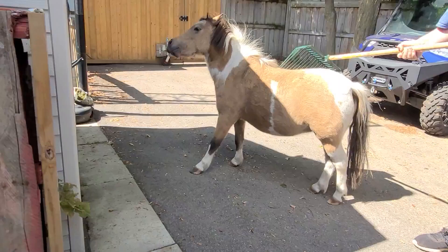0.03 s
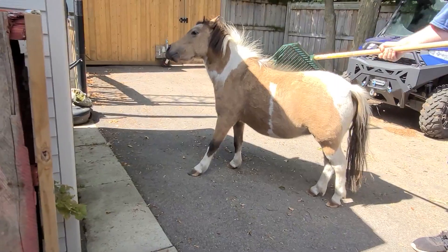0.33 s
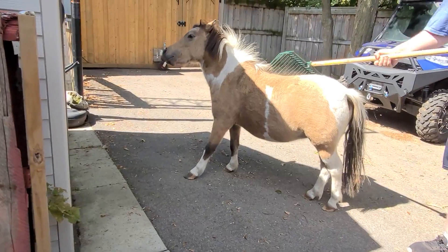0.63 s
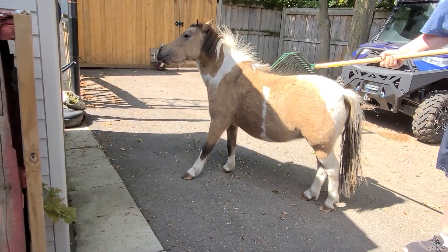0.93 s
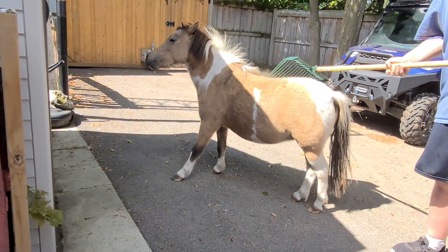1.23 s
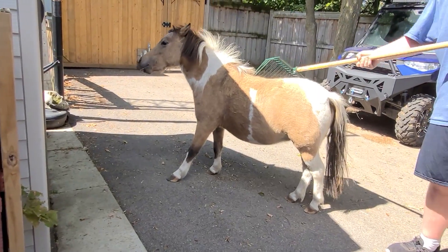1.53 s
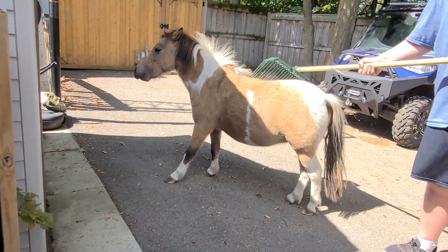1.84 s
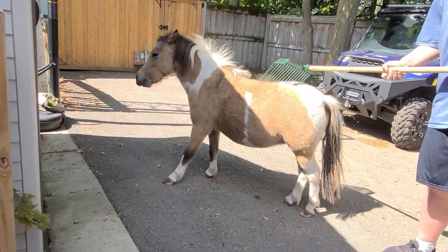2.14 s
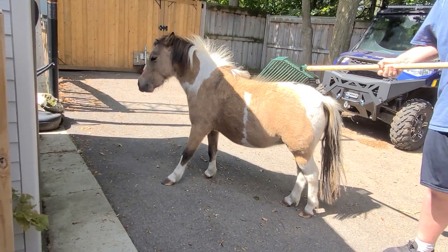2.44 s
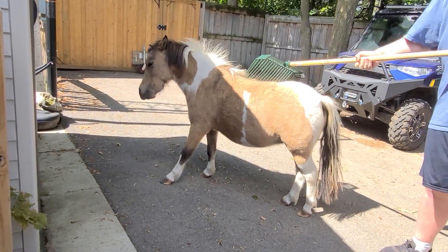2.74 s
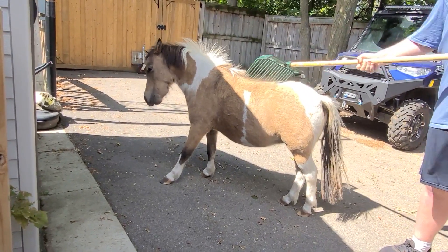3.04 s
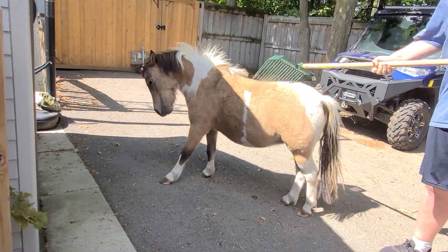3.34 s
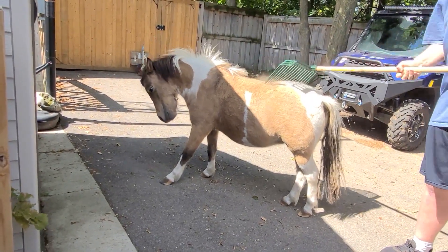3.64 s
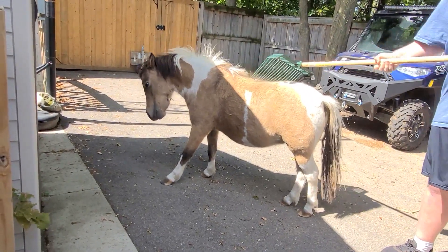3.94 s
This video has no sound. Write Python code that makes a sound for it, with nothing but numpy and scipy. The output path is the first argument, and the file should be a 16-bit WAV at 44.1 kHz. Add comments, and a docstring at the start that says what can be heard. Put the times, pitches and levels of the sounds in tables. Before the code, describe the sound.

A plastic rake strokes a small horse's back with a soft, rhythmic hiss and lightly ringing prongs, a few metres away on a driveway. The pulls grow firmer as wind thumps ever harder on the microphone's right side.

```python
"""After a blink of silence, a plastic leaf rake moves to and fro along a small horse's back, on a
driveway a few metres away. Hairs slip off the tines (the prongs) as a soft hiss and make them ring.
Early on, one tine squeaks and a tuft of hair lets go with a flick. Midway, a dull rustle swells once.
In the second half the pulls get firmer and a rising breeze thumps ever harder on the right microphone
port (its opening). A faint outdoor hush lies under it all."""
import sys
import numpy as np
from scipy import signal
from scipy.fft import rfft, irfft
from scipy.io import wavfile

SR = 44100
rng = np.random.default_rng(int(sys.argv[2]) if len(sys.argv) > 2 else 0)


def inscribe(sig):
    """Save sig as 16-bit PCM at rate SR to the path in sys.argv[1].

    A 1-D sig is mono; a 2-D sig holds one channel per row.
    Samples are clipped to [-1, 1] before scaling.
    """
    pcm = np.round(np.clip(np.atleast_2d(sig).T, -1, 1) * 32767)
    wavfile.write(sys.argv[1], SR, pcm.astype(np.int16))


N = 176400
T = np.arange(N) / SR
HZ = np.maximum(np.fft.rfftfreq(N, 1 / SR), 1)

# firm pulls of the rake: (fastest moment [s], level [dB], rise [s], fall [s], extra ringing [dB])
RAKE_PULLS = [(.278, -49, 0.062, 0.11, -1.5), (.672, -52.5, 0.07, 0.15, 0),
              (1.066, -50.5, 0.054, 0.13, -1.5), (1.862, -51, 0.066, 0.17, -2.5),
              (2.275, -48, 0.074, 0.11, 0), (2.664, -46.5, 0.072, 0.11, 0), (3.056, -45, .075, 0.099, 3),
              (3.435, -46, 0.075, 0.098, 1.5), (3.81, -44, 0.055, 0.1, 4.5)]
# light slides, mostly back: (fastest moment [s], level [dB], rise [s], fall [s], extra ringing [dB])
RAKE_SLIDES = [(.138, -55, 0.048, 0.074, -4.5), (0.509, -55, 0.16, 0.11, -1.5), (.9, -55.5, 0.097, .13, -5),
               (1.29, -56, 0.095, 0.17, -3.5), (1.48, -54.5, 0.098, .13, -2),
               (1.65, -57.5, 0.061, 0.076, 0.5), (1.738, -56, 0.083, 0.091, -2),
               (2.055, -56, 0.055, 0.034, 1.5), (2.14, -52.5, 0.096, 0.078, -3.5),
               (2.465, -55, 0.16, 0.2, -2.5), (2.855, -52, 0.12, 0.15, -1), (3.22, -52, 0.068, 0.2, -1.5),
               (3.63, -53, 0.14, 0.2, -2.5), (3.98, -50, 0.066, .1, -2)]
# tone of the hissing hair: (frequency [Hz], level [dB])
HAIR_TONE = [(300, 4.5), (700, 3), (1200, -3), (1800, 2), (2700, 0), (3400, -1.5), (4600, 3), (5600, 0),
             (6700, 1), (8200, -4), (9100, -9), (10500, -1), (12500, 0), (16000, -2.5)]
# notes the tines ring at: (pitch [Hz], width [Hz], level in a pull [dB], level in a slide [dB])
TINE_NOTES = [(1605, 46, -5.5, -4), (1759, 89, 0, -1), (1913, 49, 1.5, 0), (2056, 31, 4.5, -5.5),
              (2200, 74, -3, -4.5), (2388, 86, -2, -6), (2635, 155, -5.5, -8), (2950, 22, -17, -10),
              (4485, 106, -6, -10.5)]
# tone of the tines flicking off a tuft: (frequency [Hz], level [dB])
FLICK_TONE = [(500, -22), (1300, -5), (1750, 9), (2500, -12), (3100, -1), (4700, 0.5), (6000, -6),
              (9000, -8), (12000, -5), (16000, -7)]
# gusts hitting the ports: (time [s], strength [dB], pitch on the right [Hz], change on the left [dB])
GUSTS = [(0.142, -33, 68, -29), (.355, -50, 79.5, -25), (0.517, -38, 63.3, -20), (0.773, -30.5, 115, -26),
         (0.895, -39.5, 59.3, -18), (0.976, -37, 60.4, -28), (1.064, -31.5, 59.5, -20),
         (1.13, -27.5, 100, -14), (1.147, -30.5, 176, -30), (1.155, -24, 66.5, -33),
         (1.244, -39, 91.5, -27), (1.288, -33.5, 65, -34), (1.363, -30, 69, -38), (1.407, -35.5, 76, -26),
         (1.547, -29, 70.5, -34), (1.631, -35, 100, -22), (1.743, -23, 61.3, -36), (1.807, -34, 92, -22),
         (1.857, -28, 122, -11), (1.881, -34.5, 83, -4), (1.933, -37.5, 83.4, -32), (1.976, -32, 82, -30),
         (2.051, -28, 102, -39), (2.117, -27, 113, -31), (2.144, -24.5, 120, -31), (2.184, -26, 149, -28),
         (2.206, -29.5, 149, -30), (2.268, -33, 79.6, -29), (2.327, -32.5, 102, -30),
         (2.391, -22, 138, -34), (2.423, -28.5, 132, -24), (2.514, -27, 101, -40), (2.556, -22, 103, -39),
         (2.628, -16.5, 133.3, -35), (2.675, -18, 111, -33), (2.724, -18, 135, -30),
         (2.745, -17.5, 79, -14), (2.774, -15, 113, -25), (2.789, -22, 177, -30), (2.828, -16.5, 251, -41),
         (2.851, -24.5, 82, -15), (2.93, -17.5, 162, -38), (2.975, -20, 119, -28), (2.99, -21.5, 117, -24),
         (3.035, -17, 111, -34), (3.086, -19.5, 101, -30), (3.125, -23, 100, -3), (3.189, -20.5, 105, -19),
         (3.228, -21.5, 115, -18), (3.296, -23, 140, -18), (3.33, -21, 109, -20), (3.351, -23.5, 137, -27),
         (3.376, -23.5, 118, -25), (3.441, -20.5, 136, -24), (3.516, -19.5, 123, -34),
         (3.536, -22, 153, -27), (3.555, -20, 116, -25), (3.586, -22.5, 78.5, -26), (3.635, -19, 122, -34),
         (3.726, -20.5, 240, -41), (3.75, -19.5, 70, -23), (3.779, -20, 130, -27), (3.797, -16.5, 87, -33),
         (3.815, -23.5, 97, -30), (3.833, -21, 115, -28), (3.863, -19.5, 154, -32), (3.888, -13, 124, -41),
         (3.967, -22, 103, -20)]
# strength of the breeze: (time [s], level [dB])
BREEZE_LEVEL = [(.1, -28.5), (.7, -21), (1.1, -18), (1.5, -22), (1.75, -13.5), (2.0, -11.5), (2.2, -5.5),
                (2.47, -9), (2.72, -1.5), (3.05, 0), (3.3, -1.5), (3.42, -6), (3.55, -1.5), (3.8, 5),
                (4.0, -5)]
# how the ports colour the wind: (frequency [Hz], boost [dB])
PORT_TONE = [(15, -2), (28, 8), (45, 9), (70, -0.5), (125, -1), (190, -5), (250, 4), (340, 2), (600, 3),
             (1200, 16)]
# tone of the outdoor hush: (frequency [Hz], level [dB])
HUSH_TONE = [(25, -2), (60, 7), (105, -21), (160, 4.5), (205, -1), (280, 5.5), (350, 3.5), (480, 0),
             (900, -3), (1500, -7.5), (2200, -22), (3400, -18), (4900, -9), (6000, -18), (8000, -10.5),
             (9100, -20.5), (12000, -29.5), (16000, -52)]
# loudness of the hush: (time [s], level [dB])
HUSH_LEVEL = [(.1, -59.5), (1.5, -56.5), (2.0, -55), (2.6, -55.5), (3.3, -55.5), (4.0, -53.5)]
# tone of the dull rustle: (frequency [Hz], level [dB])
RUSTLE_TONE = [(200, -20), (450, -5), (850, -2.5), (1300, -12.5), (3000, -18.5), (16000, -36)]

SWIRL_MIN_HZ, SWIRL_MAX_HZ = 65, 250   # limits on the base pitch of small swirls


def rake(tines_db=-6, tines_right_db=2.5, hair_left_db=0.34, grip_db=1.23, grip_hz=32.8):
    """Hairs hiss and tines ring with each stroke; once, the tines catch a tuft and flick free."""
    pull, pull_ring = strokes(RAKE_PULLS)
    slide, slide_ring = strokes(RAKE_SLIDES)
    flick = swell(at_s=0.399, width_s=0.0095, db=-47.5)
    hiss = np.hypot(pull, slide) * coloured(hair_slips(), HAIR_TONE)   # hypot adds two noise levels
    hiss *= from_db([[hair_left_db], [-hair_left_db]])   # rows are left and right
    ring = pull_ring * tines(hair_slips(), pulled=True)
    ring += np.hypot(slide_ring, flick) * tines(hair_slips(), pulled=False)
    ring *= from_db([[tines_db - tines_right_db], [tines_db + tines_right_db]])
    uneven_grip = from_db(grip_db * drift(grip_hz))
    return (hiss + ring) * uneven_grip + flick * coloured(hair_slips(), FLICK_TONE)


def strokes(rows, steepness=1.99):
    """Each stroke speeds up and dies away. Gives the strength of its hiss and of its ringing."""
    hiss_power = ring_power = 0
    for peak_s, db, rise_s, fall_s, ring_db in rows:
        from_peak = np.where(T < peak_s, (peak_s - T) / rise_s, (T - peak_s) / fall_s)
        stroke = from_db(db) * np.exp(-steepness * from_peak ** 2)
        hiss_power += stroke ** 2
        ring_power += (stroke * from_db(ring_db)) ** 2
    return np.sqrt(hiss_power), np.sqrt(ring_power)


def hair_slips(hairs_per_s=14000, spread_db=2):
    """Each hair slipping off a tine makes a tiny click; left and right get their own clicks."""
    sizes = from_db(spread_db * np.minimum(rng.exponential(1, (2, N)), 5))
    signs = rng.choice([-1, 1], (2, N))
    slipping = rng.random((2, N)) < hairs_per_s / SR
    return sizes * signs * slipping


def tines(slips, pulled):
    """Clicks make the plastic tines ring in short notes, mixed differently for a pull and a slide."""
    ring = 0
    for k, (hz, width_hz, pull_db, slide_db) in enumerate(TINE_NOTES):
        decay = np.exp(-np.pi * width_hz / SR)   # a wider note dies sooner
        feedback = [1, -2 * decay * np.cos(2 * np.pi * hz / SR), decay ** 2]
        note = (1 - decay ** 2) / 2 * signal.lfilter([1, 0, -1], feedback, slips)
        ring += from_db(pull_db if pulled else slide_db) * note * (-1) ** k   # flip every other note
    bass_cut = signal.butter(2, 1400, "high", fs=SR, output="sos")
    return rms_one(signal.sosfilt(bass_cut, ring))


def squeak(pitch_hz=3072, waver=0.012):
    """One tine sticks and slips, giving a faint, short note with a shaky pitch."""
    hz = pitch_hz * (1 + waver * np.array([drift(140), drift(110)]))
    note = np.sin(2 * np.pi * np.cumsum(hz, axis=1) / SR)
    return swell(at_s=0.278, width_s=0.057, db=-59) * note


def wind(shelter_db=-19.5, shelter_pitch=0.73, bass_cut_hz=55, bass_cut_q=1.26):
    """Gusts and eddies hit the right port hard; the sheltered left one sounds softer and deeper."""
    left_gusts = [(s, db + left_db, hz * shelter_pitch) for s, db, hz, left_db in GUSTS]
    right_gusts = [(s, db, hz) for s, db, hz, _ in GUSTS]
    left = from_db(shelter_db) * eddies(shelter_pitch) + swirls(left_gusts)
    right = eddies(pitch_ratio=0.94) + swirls(right_gusts) + swirls(wakes(right_gusts))
    at_ports = filtered(np.array([left, right]), PORT_TONE)
    # a filter cuts the deepest bass and rings briefly after each thump
    corner = 2 * np.pi * bass_cut_hz
    bass_cut = signal.bilinear([1, 0, 0], [1, corner / bass_cut_q, corner ** 2], SR)
    return signal.lfilter(*bass_cut, at_ports)


def swirls(rows, length_turns=0.73, edge_speed=0.8, shorten_above_hz=200):
    """A passing swirl of air is a brief swing of pressure, quickest in its middle."""
    pressure = np.zeros(N)
    for (s, db, hz), start_turn in zip(rows, rng.random(len(rows))):
        span = slice(*np.searchsorted(T, [s - 4 / hz, s + 4 / hz]))
        turns = (T[span] - s) * hz
        length = length_turns * min(1, shorten_above_hz / hz)
        bent_turns = edge_speed * turns + (1 - edge_speed) * np.tanh(2 * turns)
        swing = np.cos(2 * np.pi * (bent_turns + start_turn))
        pressure[span] += from_db(db) * swing / np.cosh(2 * turns / length)   # fades in and out
    return pressure


def eddies(pitch_ratio, per_s=90, count=900, base_db=-31, base_hz=115):
    """Eddies are small swirls that come all the time; more breeze makes them louder and quicker."""
    times = (np.arange(count) + rng.random(count)) / per_s
    quickness, strength = rng.standard_normal((2, count))
    breeze_db = curve(BREEZE_LEVEL, times)
    octaves = 0.65 * np.clip(quickness, -1.5, 2)
    db = base_db + breeze_db + 2 * np.clip(strength, -2, 2)
    db -= 3 * octaves   # smaller, quicker eddies are weaker
    hz = np.clip(base_hz * 2 ** (octaves + 0.01 * breeze_db), SWIRL_MIN_HZ, SWIRL_MAX_HZ)
    return swirls(np.transpose([times, db, pitch_ratio * hz]))


def wakes(gusts, count=3, spread_s=0.01309, change_db=-12, pitch_ratio=1.56, spread_octaves=0.4):
    """Each gust breaks up into a few smaller swirls, most of them quicker."""
    rows = []
    for s, db, hz in gusts:
        for shift, quickness in rng.uniform(-1.01, 1, (count, 2)):
            wake_hz = hz * pitch_ratio * 2 ** (spread_octaves * quickness)
            wake_hz = np.clip(wake_hz, SWIRL_MIN_HZ, SWIRL_MAX_HZ)
            rows.append((s + spread_s * shift, db + change_db, wake_hz))
    return rows


def outdoors():
    """A faint, far hush goes on while one soft rustle comes and goes."""
    hush = from_db(curve(HUSH_LEVEL, T)) * coloured(rng.standard_normal((2, N)), HUSH_TONE)
    rustle = coloured(rng.standard_normal((2, N)), RUSTLE_TONE)
    return hush + swell(at_s=2.222, width_s=0.14, db=-54) * rustle


def from_db(db):
    """Turn decibels into a number to multiply by."""
    return 10 ** (np.asarray(db) / 20)


def rms_one(x):
    """Scale a sound so its average level (RMS) is one."""
    return x / np.sqrt(np.mean(x ** 2) + 1e-20)


def curve(rows, times):
    """Join a table's points with straight lines and read off the given times."""
    return np.interp(times, *np.transpose(rows))


def swell(at_s, width_s, db):
    """A level that rises and falls once, in a bell shape."""
    return from_db(db) * np.exp(-((T - at_s) / width_s) ** 2)


def filtered(x, tone):
    """Turn each frequency up or down as a tone table says."""
    hz, db = np.transpose(tone)
    gain = from_db(np.interp(np.log(HZ), np.log(hz), db))
    return irfft(rfft(x) * gain, N)


def coloured(x, tone):
    """Give a sound a tone and set its level to one."""
    return rms_one(filtered(x, tone))


def drift(rate_hz):
    """A random wobble of about size one, mostly slower than the given rate."""
    return rms_one(irfft(rfft(rng.standard_normal(N)) / (1 + (HZ / rate_hz) ** 2), N))


def scene():
    """The rake, the wind and the background together."""
    return rake() + squeak() + wind() + outdoors()


def record(dry, start_s=0.103, fade_s=0.0021, treble_cut_hz=15720):
    """The sound starts after a moment of silence; the highest treble is cut."""
    fade_in = np.clip((T - start_s) / fade_s, 0, 1)
    treble_cut = signal.ellip(12, 0.1, 80, treble_cut_hz, fs=SR, output="sos")
    return signal.sosfilt(treble_cut, dry * fade_in)


dry = scene()
out = record(dry)
inscribe(out)
```